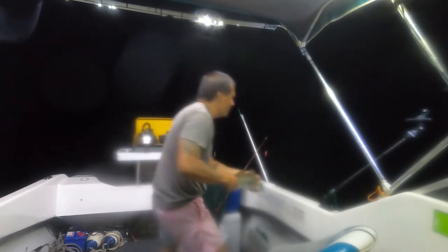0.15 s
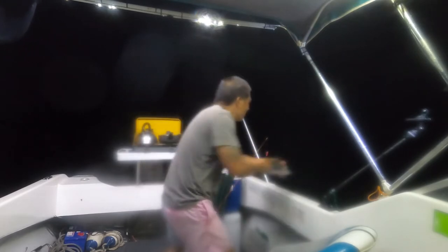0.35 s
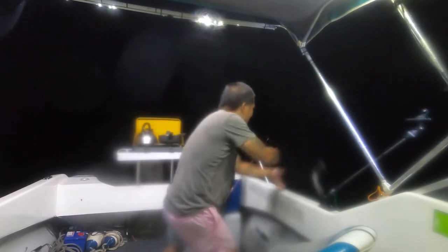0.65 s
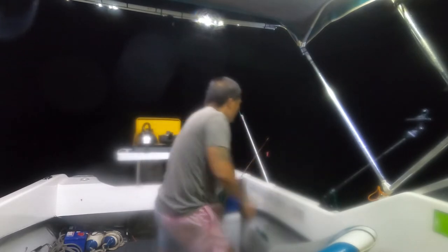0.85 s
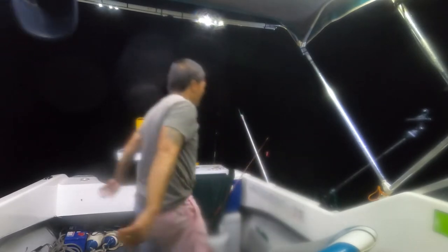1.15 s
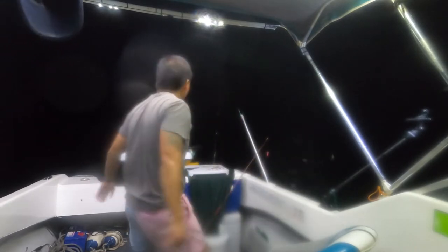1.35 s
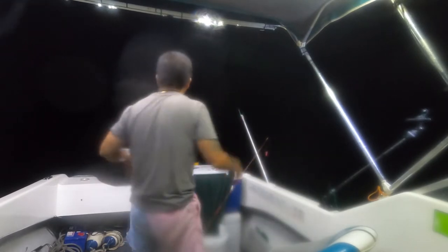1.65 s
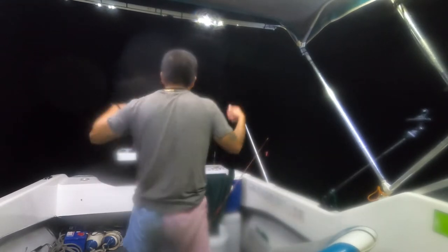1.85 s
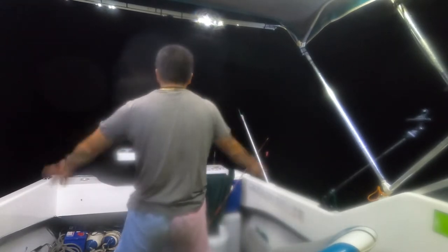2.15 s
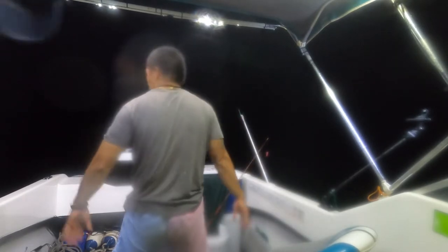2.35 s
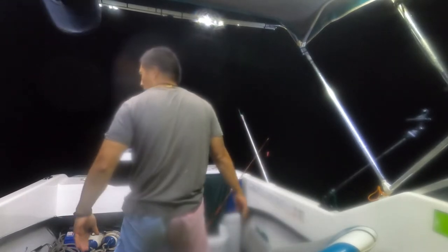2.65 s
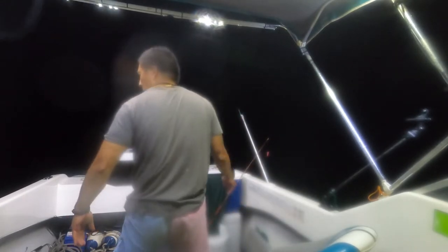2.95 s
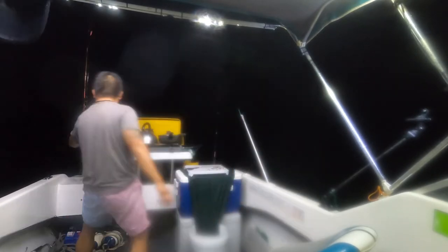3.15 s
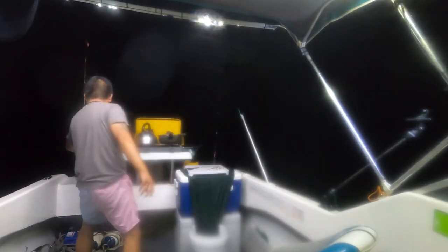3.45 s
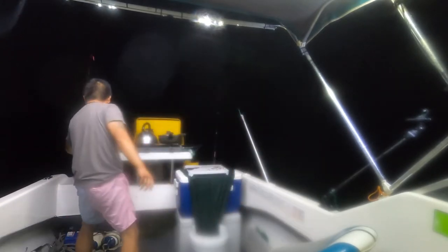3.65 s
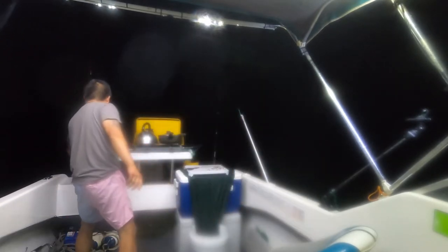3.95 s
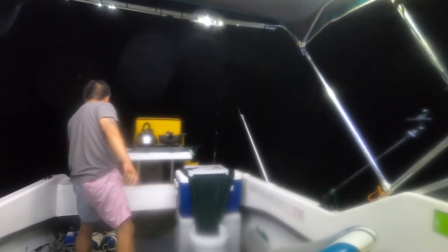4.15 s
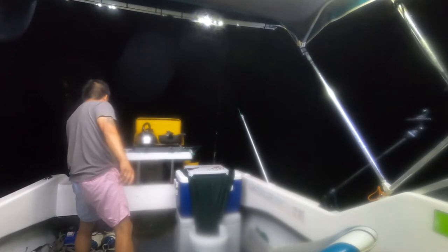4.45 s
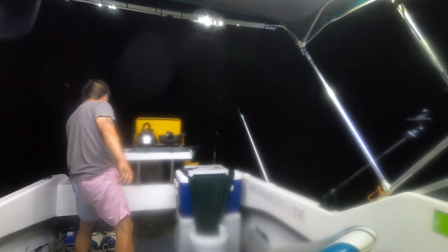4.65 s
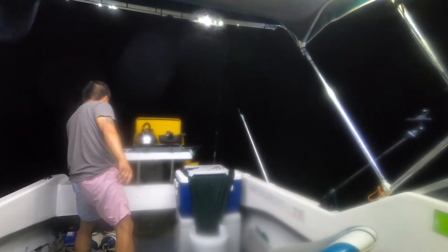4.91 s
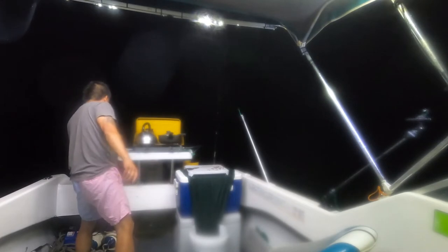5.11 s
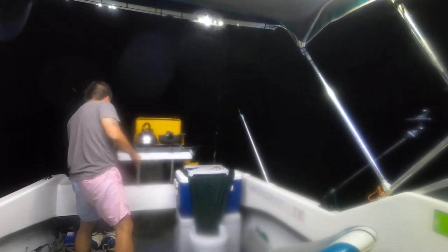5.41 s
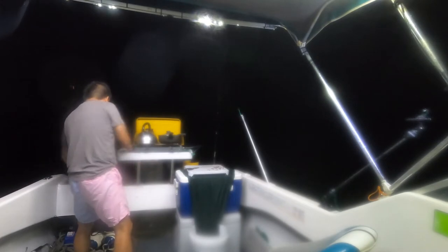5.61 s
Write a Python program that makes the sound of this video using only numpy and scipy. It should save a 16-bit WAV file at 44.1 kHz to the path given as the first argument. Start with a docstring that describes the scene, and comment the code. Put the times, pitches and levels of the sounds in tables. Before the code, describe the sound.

Hollow deck thuds and sharp plastic knocks come in irregular bursts as someone shifts about a small boat, with faint water beneath.

```python
"""Steps and bumps boom in the deck panels of a small boat as someone shifts about on it.
Blows wake damped panel modes; a plastic lid and loose gear knock and rattle with higher modes plus noise cracks.
Gritty noise makes the rustle of cloth and wet soles and the scraping; uneven load keeps the panels murmuring.
Bright noise ticks, two gliding squeaks and a faint steady noise wash of water along the hull complete it.
Two microphone ports on the hull hear it all, with short reflections from canopy and gunwales."""
import sys
import numpy as np
from scipy import signal
from scipy.fft import rfft, irfft, next_fast_len
from scipy.io import wavfile
from scipy.ndimage import uniform_filter1d

SR = 44100
rng = np.random.default_rng(int(sys.argv[2]) if len(sys.argv) > 2 else 0)


def bounce(signal):
    """Save signal as a 16-bit WAV file at the path given by the first command-line argument."""
    frames = np.transpose(np.atleast_2d(signal))
    limited = np.clip(frames, -1, 1)
    pcm = np.round(limited * 32767).astype(np.int16)
    wavfile.write(sys.argv[1], SR, pcm)


N = 254719
FFT_SIZE = next_fast_len(N)
CONTROL_STEP = 32  # samples between control values
LN_60_DB = np.log(1000)

# Deck panel modes. Each row: frequency in Hz, relative level in dB, t60 in seconds.
DECK_MODES = [(28.1, 0.5, 0.7), (38, -1.5, 0.24), (56.8, -2, 1), (77.1, 6.5, 0.2), (94, 1.5, 0.43),
              (105.8, 1, 0.86), (127.4, 4, 0.63), (163.6, 4.5, 0.19), (199, 6, 0.11), (249.5, 4, 0.1),
              (296, -3, 0.19), (346, 0, 0.33), (392.2, 1, 0.093), (454, -3, 0.13), (522, -4.5, 0.12),
              (636, -7, 0.036)]
# Lid and gear modes. Each row: frequency in Hz, relative level in dB, t60 in seconds.
GEAR_MODES = [(1037, 4.5, 0.027), (1156, 6.5, 0.068), (1269.4, 9, 0.031), (1314.5, 10, 0.026),
              (1469, 8, 0.009), (1694, 5, 0.038), (1974, 9.5, 0.0093), (2354, -4.5, 0.035),
              (2783, 0.5, 0.078), (3370, 6.5, 0.01), (3780, -0.5, 0.024), (4720, 23, 0.011),
              (5450, -6.5, 0.012)]


def undb(db):
    """Amplitude of a level in dB."""
    return 10 ** (np.asarray(db) / 20)


def unit(x):
    """Scale to rms 1."""
    return x / np.sqrt(np.mean(x ** 2))


def curves(table):
    """Columns of a time-first table, interpolated to one value a sample."""
    s, *columns = np.transpose(table)
    return [np.interp(np.arange(N) / SR, s, c) for c in columns]


def colour(x, points):
    """Filter by (Hz, dB) points, interpolated over log frequency."""
    hz, db = np.transpose(points)
    f = np.fft.rfftfreq(FFT_SIZE, 1 / SR) + 1
    gain = undb(np.interp(np.log(f), np.log(hz), db))
    return irfft(rfft(x, FFT_SIZE) * gain, FFT_SIZE)[..., :N]


def band(x, lo_hz, hi_hz):
    """Butterworth band-pass."""
    sos = signal.butter(2, [lo_hz, min(hi_hz, .45 * SR)], "band", fs=SR, output="sos")
    return signal.sosfilt(sos, x)


def ring(x, modes, lo_hz=0, hi_hz=20000):
    """Drive the modes in a range, each a decaying one-pole complex resonator."""
    out = 0
    for k, (hz, db, t60) in enumerate(modes):
        if lo_hz <= hz <= hi_hz:
            pole = np.exp(2j * np.pi * hz / SR - LN_60_DB / (t60 * SR))
            mode = signal.lfilter([1 / np.sqrt(t60)], [1, -pole], x).imag
            out = out + (-1) ** k * undb(db) * mode
    return out


def grit(rate_per_s, spread_db, grain_s):
    """Noise broken into decaying grains of uneven size, two unrelated rows."""
    grain_cap = 3  # largest grain, in spreads
    size_db = spread_db * np.minimum(rng.exponential(size=(2, N)), grain_cap)
    hits = (rng.random((2, N)) < rate_per_s / SR) * undb(size_db)
    shape = signal.lfilter([1], [1, -np.exp(-1 / (grain_s * SR))], hits)
    return unit(rng.standard_normal((2, N)) * (shape + 1.1 * shape.mean()))


def ports(pair, spread):
    """Two microphone ports: alike in the bass, ever less alike in the treble."""
    wide_hz = 2750  # where the ports begin to differ at spread 1
    f = np.fft.rfftfreq(FFT_SIZE, 1 / SR)
    wide = np.clip(spread * f / np.hypot(f, wide_hz), 0, 1)
    mid, side = rfft(pair, FFT_SIZE) * [np.ones_like(f), wide] / np.sqrt(1 + wide ** 2)
    return irfft(np.array([mid + side, mid - side]), FFT_SIZE)[:, :N]


def add(out, s, sound):
    """Mix a sound in at a time in seconds."""
    i = int(s * SR)
    out[i:i + len(sound)] += sound[:N - i]


def power_sum(levels_db):
    """Gain, one value a sample, of several unrelated sounds of one kind played together."""
    gain = np.sqrt(sum(undb(db) ** 2 for db in levels_db))
    return np.repeat(gain, CONTROL_STEP, axis=1)[:, :N]


def blows(events, modes, reach_oct, push_cycles):
    """Each blow wakes the modes near the pitch of its spot; lower spots take a longer, softer push."""
    out = np.zeros(N)
    hz, mode_db, t60 = np.array(modes, float).T[:, :, None]
    chances = rng.standard_normal((len(events), len(modes), 2))
    for (s, db, spot_hz, *held_t60), chance in zip(events, chances):
        level_chance, pitch_chance = chance[:, :1], chance[:, 1:]
        reach = np.exp(-.5 * (np.log2(hz / spot_hz) / reach_oct) ** 2)
        near = reach * undb(mode_db + 5.65 * level_chance)
        loss = 1 / t60 + sum(1 / h for h in held_t60)  # whatever rests on it damps it further
        t = np.arange(int(SR / loss.min())) / SR
        tone = np.sin(2 * np.pi * hz * (1 + 0.0135 * pitch_chance) * t)
        free = tone * np.exp(-LN_60_DB * t * loss)
        push = np.sin(np.pi / 2 * np.minimum(t * spot_hz / push_cycles, 1)) ** 2
        sound = (near * free).sum(0) * push
        add(out, s, undb(db) * sound / np.abs(sound).max())
    return out


def water():
    """Faint steady wash along the hull: coloured noise."""
    # Each row: frequency in Hz, relative spectral level in dB.
    wash_spectrum = [(190, 4.5), (330, -1.5), (833, -17), (1010, -13.5), (1220, -14), (5480, -24),
                     (7670, -42.5), (10700, -70.5), (12600, -43.5), (15000, -61.5)]
    wash = unit(colour(rng.standard_normal((2, N)), wash_spectrum))
    return undb(-58.5) * ports(wash, 7.8)


def load_gains():
    """Each load comes on quickly, holds, and dies away at a steady rate, slowest in the hull."""
    # Weight put on the deck. Each row: start in seconds, time from start to release in seconds,
    # hull sway in dB, panel boom in dB, panel creak in dB.
    load_rows = [(0.0, 0.025, -31, -39, -51), (0.483, 0.086, -41, -39.5, -52),
                 (0.765, 0.068, -88, -42.5, -70), (0.93, 0.15, -40.5, -37.5, -43),
                 (1.314, 0.28, -27, -29.5, -48.5), (2.261, 0.23, -39, -27.5, -44),
                 (2.577, 0.14, -37, -32.5, -43), (3.034, 0.051, -26.5, -30.5, -43),
                 (3.237, 0.063, -33.5, -34.5, -51), (3.676, 0.088, -50.5, -45.5, -51),
                 (4.108, 0.016, -37, -14.5, -34), (4.378, 0.069, -39, -36.5, -61),
                 (3.79, 0.25, -53, -57, -61), (4.616, 0.057, -55, -36.5, -56), (4.821, 0.15, -49, -41, -50),
                 (5.153, 0.29, -46.5, -34.5, -51.5)]
    attack_s = 0.0281  # rises 60 dB in this time, reaching full level this long after the start
    release_db_per_s = np.array((60, 94.5, 137))[:, None]  # sway, boom, creak
    rest_db = np.array((-66.5, -46, -60))[:, None]  # the deck is never quite still
    t = np.arange(0, N, CONTROL_STEP) / SR
    shapes = []
    for s, hold, *dbs in load_rows:
        below_db = 60 * np.clip((s - t) / attack_s + 1, 0, 2)
        fall_db = release_db_per_s * np.maximum(t - s - hold, 0)
        shapes.append(np.array(dbs)[:, None] - below_db - fall_db)
    return power_sum(shapes + [rest_db])


def shifting():
    """Uneven load on the deck keeps its panels murmuring; the two ports feel it almost alike."""
    load = grit(rate_per_s=72.0, spread_db=1.0, grain_s=0.01)[0]
    ranges_hz = [(0, 66), (67, 270), (271, 700)]  # sway, boom, creak
    panels = [unit(ring(load, DECK_MODES, *r)) for r in ranges_hz]
    gains = load_gains()
    mid = sum(g * p for g, p in zip(gains, panels))
    side = sum(g * p[::-1] for g, p in zip(gains, panels))  # an unrelated stretch of the same murmur
    return mid + np.outer([.17, -.17], side)


def stroke_gains():
    """Each stroke swells to its loudest moment and fades, over the faint rustle."""
    # Strokes of rubbing. Each row: loudest moment in seconds, swell in seconds, fade in seconds,
    # cloth swish in dB, hard surfaces scraping in dB, fine hiss in dB.
    stroke_rows = [(0.018, 0.15, 0.045, -36.5, -46.5, -37.5), (0.3, 0.25, 0.069, -83, -47, -77),
                   (0.618, 0.31, 0.052, -37, -43.5, -43.5), (0.898, 0.0081, 0.27, -31.5, -30, -47),
                   (0.97, 0.056, 0.11, -47, -40, -34), (1.05, 0.044, 0.1, -24.5, -19, -39),
                   (1.15, 0.1, 1, -45, -43.5, -55.5), (1.45, 0.22, 0.17, -34.5, -32.5, -50),
                   (1.629, 0.21, 0.2, -36.5, -94, -48), (2.278, 0.052, 0.054, -41, -33, -71),
                   (2.641, 0.088, 0.16, -37, -39.5, -45.5), (2.78, 0.3, 0.13, -51, -51, -78),
                   (3.3, 0.7, 0.71, -50, -100.5, -54.5), (3.77, 0.24, 0.23, -46.5, -51.5, -51),
                   (4.125, 0.09, 0.2, -44, -49.5, -49), (4.135, 0.0092, 0.043, -47.5, -14.5, -44),
                   (4.43, 0.037, 0.082, -61, -51, -82), (5.2, 0.02, 0.067, -60, -51.5, -65),
                   (5.398, 0.32, 0.48, -56.5, -52, -73.5), (5.78, 0.12, 0.1, -42, -45, -45)]
    # Rustle between strokes. Each row: time in seconds, swish in dB, scraping in dB, hiss in dB.
    rustle_rows = [(0, -53, -51, -67.5), (2.2, -54, -51, -60), (3.0, -64, -51, -71.5), (4.1, -57, -58, -58),
                   (4.3, -62.5, -62, -79), (4.95, -60, -55.5, -75.5), (5.77, -60, -70, -69)]
    range_db = 20  # swell and fade are the times taken to cross this range
    t = np.arange(0, N, CONTROL_STEP) / SR
    shapes = []
    for s, swell, fade, *dbs in stroke_rows:
        away = np.maximum((s - t) / max(swell, .003), (t - s) / max(fade, .003))
        shapes.append(np.array(dbs)[:, None] - range_db * away)
    return power_sum(shapes + [np.array(curves(rustle_rows))[:, ::CONTROL_STEP]])


def rubbing():
    """Gritty scraping sounds the gear's lower modes; cloth swishes and hisses as coloured gritty noise."""
    # Each row: frequency in Hz, relative spectral level in dB.
    cloth_spectrum = [(1700, -41), (2400, 0.5), (3500, -0.5), (6500, -2.5), (8600, -4), (12400, -15),
                      (15000, -24)]
    swish_top_hz = 6000
    swish, scrape, hiss = stroke_gains()
    scrape_grit = grit(rate_per_s=280.0, spread_db=3.5, grain_s=0.0024)
    hard = np.array([ring(g, GEAR_MODES, hi_hz=2500) for g in scrape_grit])
    cloth = colour(grit(rate_per_s=970.0, spread_db=7.0, grain_s=0.0066), cloth_spectrum)
    low = band(cloth, 1500, swish_top_hz)
    high = band(cloth[:, ::-1], swish_top_hz, 17000)  # reversed, so unrelated to the swish
    return ports(scrape * unit(hard) + swish * unit(low) + hiss * unit(high), 0.99)


def deck_thumps():
    """Steps and bumps: blows on the panel modes, damped by the weight left resting there."""
    # Each row: start in seconds, peak in dB, pitch of the struck spot in Hz,
    # t60 in seconds left by the weight resting on it.
    thump_rows = [(0.035, -28.5, 77, 0.15), (0.071, -30, 73.5, 0.15), (0.621, -28.5, 132, 0.05),
                  (0.761, -23, 79, 0.15), (0.82, -26, 35, 0.055), (0.979, -17.5, 438, 0.075),
                  (1.047, -11, 333, 0.029), (1.068, -13, 508, 0.29), (1.078, -5.5, 205.3, 0.077),
                  (1.324, -15, 81, 0.13), (1.33, -20, 240, 0.064), (1.362, -19, 73.5, 0.2),
                  (1.401, -12.5, 112, 0.078), (1.391, -23.5, 557, 0.45), (1.45, -10, 115, 0.16),
                  (1.484, -6, 102, 0.1), (1.51, -22.5, 428, 0.12), (1.56, -9.5, 89, 0.096),
                  (1.614, -17.5, 107, 0.14), (2.113, -26.5, 690, 0.0089), (2.256, -22.5, 180, 0.07),
                  (2.27, -20, 91, 0.37), (2.279, -20.5, 277, 0.071), (2.3, -38, 153, 0.076),
                  (2.324, -20, 135, 0.19), (2.372, -14, 159.6, 0.066), (2.427, -13, 129, 0.067),
                  (2.433, -20.5, 307, 0.2), (2.455, -23, 357, 0.72), (2.484, -15.5, 104, 0.076),
                  (2.532, -18, 103, 0.074), (2.615, -19.5, 248, 0.16), (2.728, -27.5, 146, 0.041),
                  (3.035, -23, 157, 0.045), (3.063, -14, 28.7, 0.28), (3.083, -12, 104, 0.077),
                  (3.116, -15, 38.6, 0.46), (3.204, -25, 96, 0.089), (3.215, -25, 29.3, 0.27),
                  (3.266, -22, 323, 0.015), (3.284, -25, 363, 0.071), (3.69, -19, 215, 0.13),
                  (3.703, -15.5, 286, 0.055), (3.722, -19, 172, 0.18), (4.0, -31, 328, 0.069),
                  (4.129, -7.5, 230, 0.074), (4.131, -15, 535, 0.027), (4.147, -3.5, 299.6, 0.058),
                  (4.159, -1, 123, 0.086), (4.19, -20.5, 385, 0.14), (4.219, -17, 143, 0.16),
                  (4.26, -22, 121, 0.2), (4.367, -21.5, 106.6, 0.069), (4.42, -15, 105.4, 0.12),
                  (4.424, -33, 427, 0.15), (4.448, -16, 89, 0.28), (4.489, -13, 103, 0.052),
                  (4.514, -18.5, 104.4, 0.1), (4.623, -23, 227, 0.087), (4.648, -25.5, 296, 0.047),
                  (4.691, -26, 132, 0.091), (4.85, -38.5, 340, 0.25), (4.945, -29.5, 196, 0.9),
                  (5.183, -21, 212, 0.17), (5.192, -18.5, 292, 0.098), (5.218, -19.5, 151, 0.087),
                  (5.332, -26, 171, 0.59), (5.37, -32, 405, 0.31), (5.376, -26, 256, 0.16),
                  (5.396, -26.5, 222, 0.25), (5.426, -26, 179, 0.49), (5.46, -33, 370, 0.13)]
    return blows(thump_rows, DECK_MODES, reach_oct=0.22, push_cycles=2.16)


def canopy(x):
    """Short scattered reflections from canopy and gunwales, different at each port; no bass returns."""
    t60_s, level_db = 0.13, -5.5
    t = np.arange(SR // 3) / SR
    tail = rng.standard_normal((2, len(t))) * np.exp(-LN_60_DB * t / t60_s) * (t > .003)
    tail = band(tail / np.linalg.norm(tail[0]), 340, 7800)
    return undb(level_db) * signal.fftconvolve(x[None], tail, axes=1)[:, :N]


def ticks():
    """Short bright ticks and scuffs: sharp noise bursts that die away, broad around their centre."""
    # Each row: start in seconds, rms level in dB before the envelope, centre in Hz, t60 in seconds.
    tick_rows = [(0.1366, -43.5, 5550, 0.097), (0.767, -45, 5260, 0.11), (0.8985, -26, 4600, 0.18),
                 (0.9554, -18.5, 4150, 0.031), (1.036, -15.5, 4830, 0.078), (1.34, -37.5, 5950, 0.19),
                 (1.6172, -29, 4700, 0.11), (1.9027, -47, 5160, 0.39), (1.973, -36, 4830, 0.12),
                 (2.081, -45.5, 6300, 0.05), (2.1678, -36.5, 6000, 0.22), (2.33, -53, 9500, 0.1),
                 (2.619, -27, 4100, 0.032), (2.7222, -32, 5100, 0.029), (3.042, -41.5, 5750, 0.084),
                 (3.945, -51, 10000, 0.1), (4.1302, -21.5, 3000, 0.14), (4.3827, -52.5, 5350, 0.071),
                 (4.755, -47.5, 6700, 0.065), (5.03, -63, 9500, 0.08), (5.615, -56.5, 11600, 0.071)]
    attack_s = 0.0012
    top_ratio = 1.8  # upper edge of the second band-pass, in centres
    out = np.zeros((2, N))
    t = np.arange(SR // 4) / SR
    for s, db, hz, t60 in tick_rows:
        noise = band(rng.standard_normal((2, len(t))), hz / 2.0, hz * 1.39)
        noise = band(noise, hz / 3, hz * top_ratio)
        decay = np.exp(-LN_60_DB * t / max(t60, .005))
        burst = unit(noise) * decay * (1 - np.exp(-t / attack_s))
        add(out.T, s, undb(db) * burst.T)
    return ports(out, 1.0)


def squeaks():
    """A wet surface squeaks as it slips: a rough tone that glides up, swelling and fading."""
    # Each row: start in seconds, length in seconds, first pitch in Hz, last pitch in Hz,
    # peak level in dB before the roughness.
    squeak_rows = [(0.264, 0.091, 863, 1097, -50.5), (1.578, 0.054, 570, 1040, -44)]
    out = np.zeros(N)
    for s, length, from_hz, to_hz, db in squeak_rows:
        u = np.linspace(0, 1, int(length * SR))
        rough = unit(uniform_filter1d(rng.standard_normal(len(u)), size=120))
        phase = 2 * np.pi * np.cumsum(from_hz * (to_hz / from_hz) ** u) / SR
        add(out, s, undb(db) * np.sin(np.pi * u) * (1 + rough) * np.sin(phase))
    return out


def cracks(events, below_db, t60):
    """The contact itself: a broad, short crack of noise under every knock, brighter for higher spots."""
    attack_s = 0.00028
    out = np.zeros(N)
    t = np.arange(SR // 10) / SR
    for s, db, spot_hz, *_ in events:
        noise = unit(band(rng.standard_normal(len(t)), spot_hz / 3.2, spot_hz * 2.05))
        envelope = np.exp(-LN_60_DB * t / t60) * (1 - np.exp(-t / attack_s))
        add(out, s, undb(db - below_db) * noise * envelope)
    return out


def chatter():
    """Loose gear chatters: small damped knocks at random moments and spots within each spell."""
    # Each row: start in seconds, length in seconds, middle of the peak levels in dB, highest spot in Hz.
    rattle_rows = [(0.9, 0.22, -26, 4000), (0.898, 0.26, -29, 1430), (1.356, 0.21, -31.5, 1460),
                   (1.377, 0.27, -34, 4700), (1.647, 0.16, -47, 2720), (2.276, 0.27, -45, 2720),
                   (2.62, 0.33, -43, 2030)]
    knocks_per_s = 90  # of the length rounded to 0.1 s
    lo_hz, spread_db = 1020, 8.5
    t60_s = 0.06  # pieces lying against each other damp one another
    rows = []
    for s, length, db, hi_hz in rattle_rows:
        count = int(round(length, 1) * knocks_per_s)
        when, size, spot = rng.random((count, 3)).T
        peak_db = db + spread_db * (2 * size - 1)
        spot_hz = lo_hz * (hi_hz / lo_hz) ** spot
        rows += zip(s + length * when, peak_db, spot_hz, np.full(count, t60_s))
    return rows


def gear_knocks():
    """Lid and loose gear: blows on the gear modes, each with its contact crack."""
    # Each row: start in seconds, peak of the ringing in dB, pitch of the struck spot in Hz.
    knock_rows = [(0.455, -29, 2262.0), (0.899, -16.5, 3600), (0.901, -16, 1290), (0.937, -18, 3700),
                  (0.946, -11, 1170), (0.959, -4.5, 3390), (0.988, -15.5, 1240), (1.033, -9.5, 1240),
                  (1.061, -7.5, 1240), (1.066, -8, 1980), (1.069, -4, 1290), (1.142, -32, 1120),
                  (1.172, -30, 2140), (1.249, -29.5, 2100), (1.434, -20, 1360), (1.451, -22, 3500),
                  (1.484, -18.5, 1360), (1.497, -17.5, 3570), (1.524, -21, 3850), (1.537, -26.5, 1260),
                  (1.651, -19.5, 1930), (1.676, -26, 3700), (1.7, -26, 1230), (1.742, -23, 1940),
                  (1.781, -33, 1870), (2.115, -26, 1440), (2.274, -23.5, 2130), (2.287, -24, 970),
                  (2.463, -32.5, 1360), (2.615, -24, 1280), (2.768, -30.5, 1960), (2.821, -38, 1440),
                  (2.983, -42, 1280), (3.031, -39, 1170), (3.082, -33.5, 1165), (3.998, -30.5, 1230),
                  (4.131, -11.5, 1440), (4.136, -14, 2380), (4.14, -16.5, 960), (4.15, -26, 1920),
                  (4.19, -31, 2830), (4.422, -42.5, 1500), (5.41, -37.5, 3300)]
    events = knock_rows + chatter()
    ringing = blows(events, GEAR_MODES, reach_oct=0.14, push_cycles=3.3)
    return ringing + cracks(events, below_db=11.5, t60=0.054)


def scene():
    """All sources as they reach the two ports."""
    left_lag = 2  # samples
    deck, gear, bright = deck_thumps(), gear_knocks(), ticks()
    near = deck + np.outer(undb([1.5, -1.5]), gear)  # the gear lies a little to the left
    reflected = canopy(gear + 0.68 * deck + bright.mean(0))
    air = near + reflected + shifting() + bright + rubbing() + water() + squeaks()
    air[0] = np.interp(np.arange(N) - left_lag, np.arange(N), air[0])
    return air


def record(dry):
    """The right port is a little brighter; the hardest blows clip, then a steep low-pass cuts the top."""
    treble_db = (-1.7, 1.7)  # left, right
    toned = np.array([colour(row, [(4500, 0), (8000, db)]) for row, db in zip(dry, treble_db)])
    low_pass = signal.ellip(10, .2, 90, 15700, fs=SR, output="sos")
    return signal.sosfilt(low_pass, np.clip(toned, -1, 1))


dry = scene()
out = record(dry)
bounce(out)
```